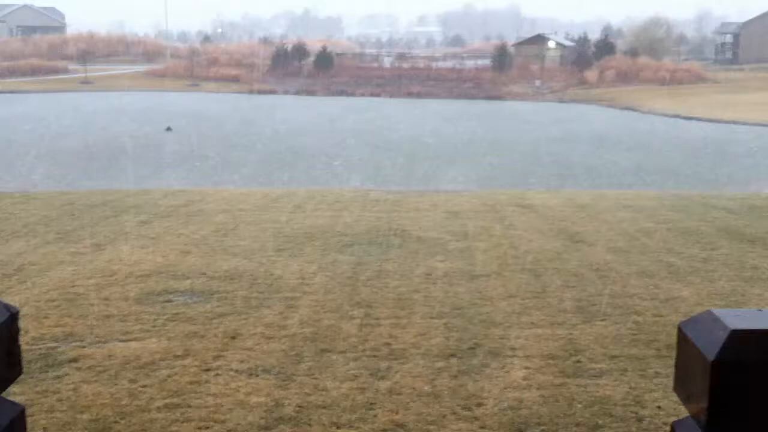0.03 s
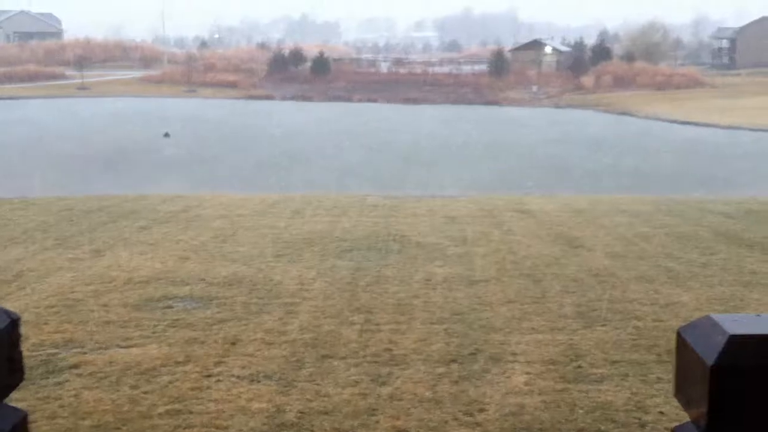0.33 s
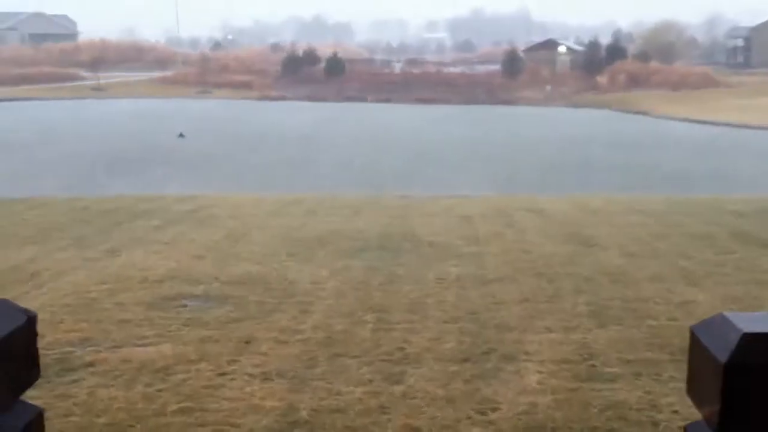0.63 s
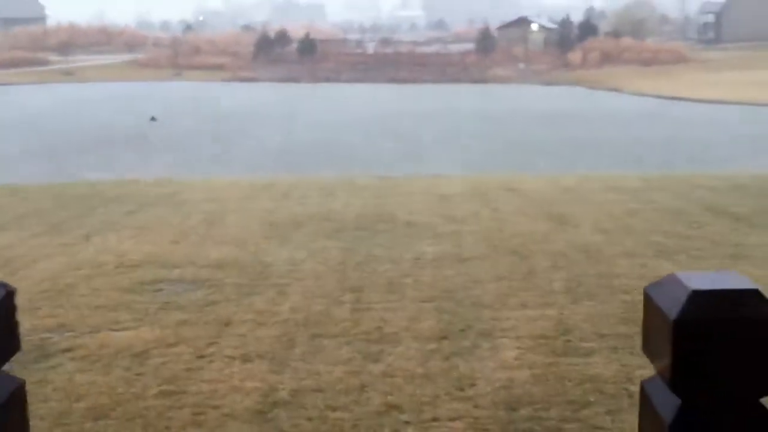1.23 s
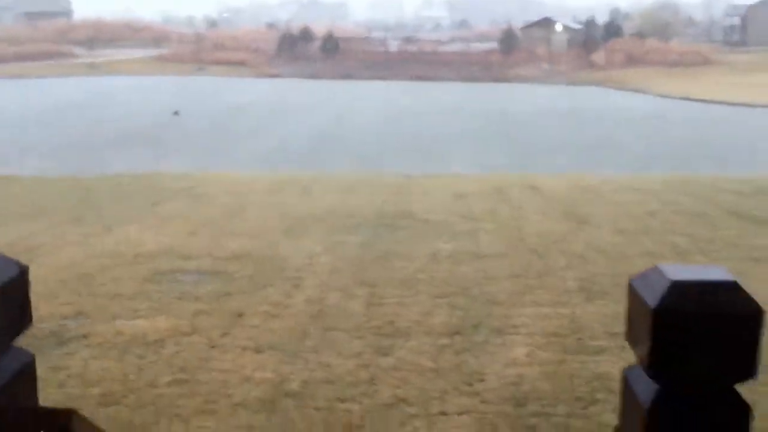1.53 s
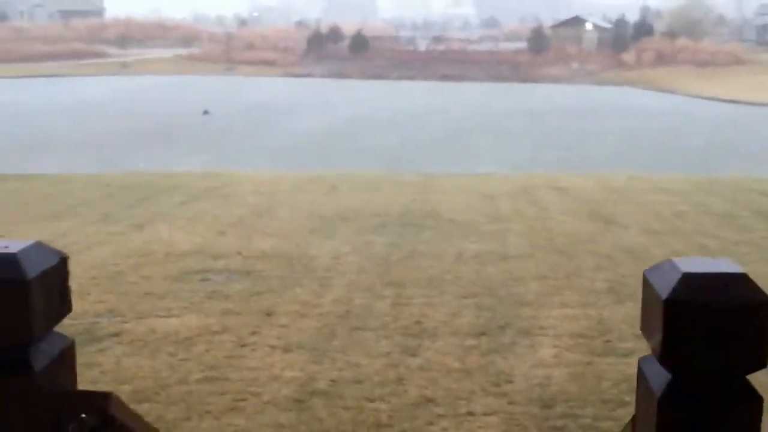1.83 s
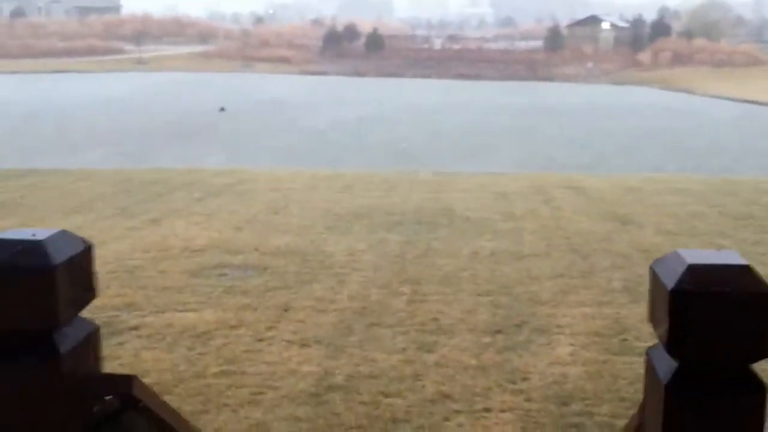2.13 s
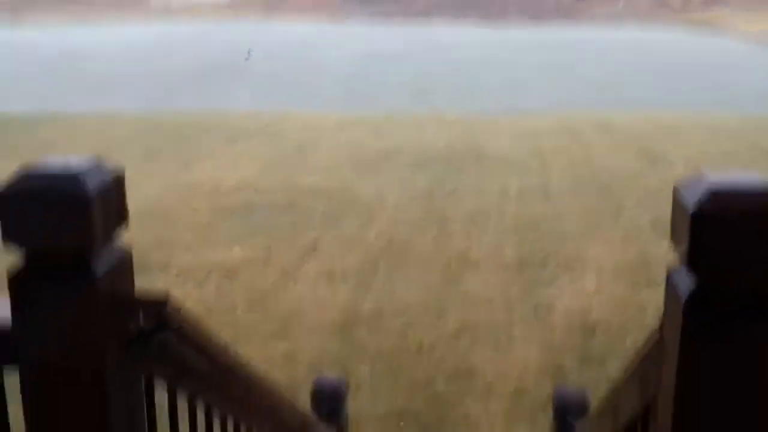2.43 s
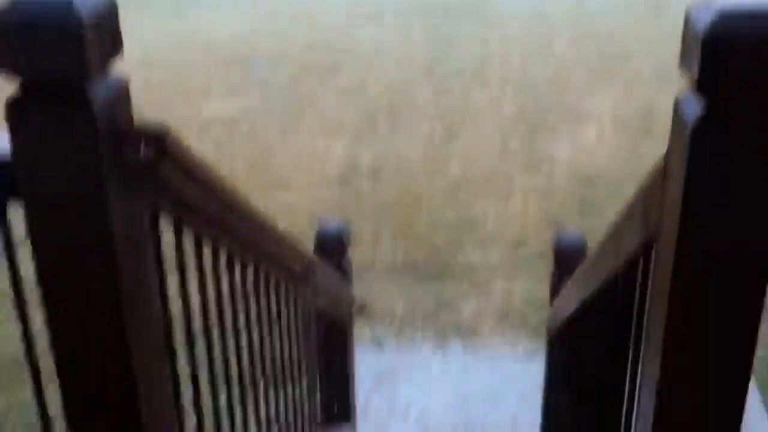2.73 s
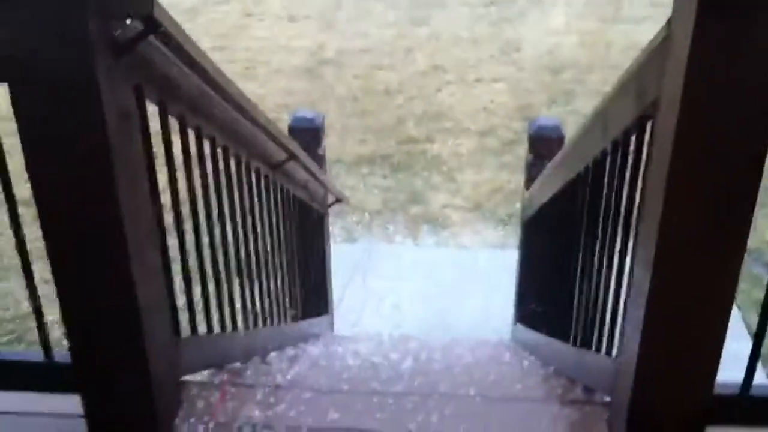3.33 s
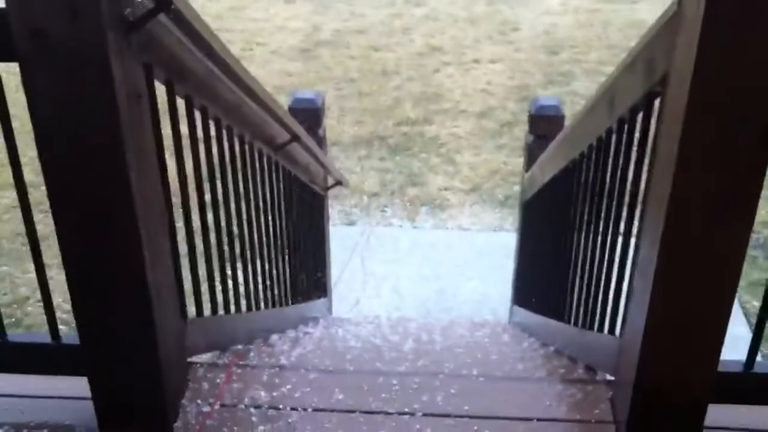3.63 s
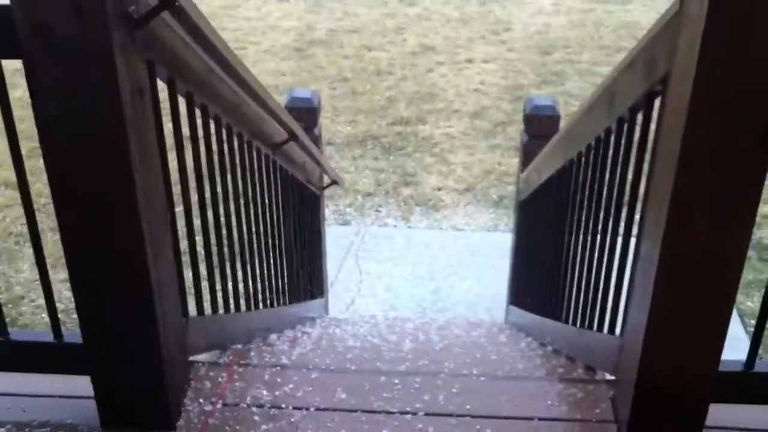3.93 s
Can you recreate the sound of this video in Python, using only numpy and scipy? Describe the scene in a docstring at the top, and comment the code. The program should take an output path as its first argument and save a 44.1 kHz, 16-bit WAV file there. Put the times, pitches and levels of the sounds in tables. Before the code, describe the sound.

Dense hail comes down outdoors, a constant hiss and patter across the grass and a wooden deck. Throughout, larger stones knock and shatter on the wood with short hollow notes, and dry ticks land close by.

```python
"""Hail falls steadily on a wooden deck and the lawn beyond it.
Countless far stones merge into a hiss, while small pellets patter and middling stones tap on the boards.
Big stones clack on the wood and shatter, each with a short echo. Some set a rail or board ringing,
and a few land close by as dry, sharp ticks."""
import sys
import numpy as np
from scipy import signal
from scipy.fft import rfft, irfft
from scipy.io import wavfile

SR = 44100
rng = np.random.default_rng(int(sys.argv[2]) if len(sys.argv) > 2 else 0)


def put_to_file(sound):
    """Save the sound as 16-bit audio at rate SR, in the file named by the first command-line argument."""
    columns = np.atleast_2d(sound).T  # one column per channel
    safe = np.clip(columns, -1, 1)
    whole_steps = np.round(safe * 32767)
    wavfile.write(sys.argv[1], SR, whole_steps.astype(np.int16))


N = 176400
T = np.arange(N) / SR

# how hard it hails over time: t/s, level/dB
HAIL_STRENGTH = [(.12, -23.5), (.3, -25), (.68, -26), (.8, -26.5), (1.05, -24.5), (1.25, -26), (1.46, -26),
                 (1.66, -25.5), (1.95, -26.5), (2.12, -25.5), (2.3, -25), (2.5, -26), (2.8, -25),
                 (3.15, -25.5), (3.45, -24), (3.59, -25.5), (3.75, -23.5), (4, -26.5)]
# tone of the far hiss before the deck shapes it: f/Hz, level/dB
HISS_TONE = [(60, 1), (150, 2), (300, 1), (500, -0.2), (800, -0.65), (2000, 1.17), (4000, -4.5),
             (6000, -2.5), (10000, 0), (15000, 5.5)]
# broad tone of the deck and its surroundings: f/Hz, level/dB
DECK_TONE = [(15, -72), (25, -69), (82, -28), (148, -12.5), (216, -9), (267, -5), (323, -10), (360, -6.5),
             (434, -10), (744, -4), (948, -4.5), (1180, -2.5), (1670, -4), (1860, -0.5), (2860, -8.5),
             (3640, -5.5), (4640, -8), (5030, -12), (5920, -6.5), (7140, -11), (8400, -10), (10400, -13),
             (13600, -30.5), (15600, -49)]
# ringing of the boards, added to that tone: f/Hz, width/Hz, level/dB
BOARD_RESONANCES = [(152, 56, -9), (269, 33, -8), (773, 64, -10), (850, 78, -13), (1830, 15, -33),
                    (4640, 210, -6.5), (5460, 200, -8)]
# notes of a board when a stone hits it: f/Hz, width/Hz, level/dB
BOARD_NOTES = [(540, 130, 0.5), (714, 190, 1), (836, 200, -3.5), (958, 31, -5), (1290, 320, -12),
               (1487, 100, 0.5), (1782, 35, -0.5), (2090, 94, -1), (2330, 34, -1.5)]
# big stones: t/s, thud level/dB, knock level/dB, crack level/dB
BIG_STONES = [(0.146, -24, -16, -17), (0.201, -28, -24, -27), (0.241, -29, -19, -18),
              (0.277, -36, -19, -23), (0.321, -32, -24, -21), (0.45, -36, -26, -20),
              (0.461, -33, -19, -19.5), (0.532, -30, -23, -22), (0.57, -38, -23, -27),
              (0.585, -36, -19, -23), (0.592, -34, -20, -20), (0.617, -39, -29, -27),
              (0.721, -28, -23, -21), (0.82, -36, -22, -24), (0.863, -33, -24, -22), (0.893, -27, -20, -18),
              (0.923, -31, -20, -18), (0.934, -26, -17, -22), (0.966, -26, -19, -24),
              (1.004, -26, -19, -23), (1.022, -29, -20, -21), (1.046, -33, -24, -19),
              (1.076, -30, -17, -26), (1.099, -33, -20, -22), (1.126, -29, -24, -26),
              (1.138, -31, -18, -21), (1.183, -24, -17, -21), (1.272, -31, -20, -20),
              (1.284, -31, -17, -20), (1.331, -40, -28, -27), (1.392, -35, -22, -30),
              (1.406, -35, -22, -32), (1.495, -33, -24, -23), (1.503, -30, -21, -25), (1.53, -26, -24, -20),
              (1.549, -28, -18, -20), (1.577, -30, -21, -24), (1.605, -28, -22, -30),
              (1.699, -36, -20, -29), (1.717, -21, -18, -21), (1.758, -30, -21, -20),
              (1.818, -27, -23, -25), (1.861, -22, -22, -27), (1.976, -42, -32, -21),
              (1.998, -30, -31, -22), (2.012, -24, -23, -27), (2.051, -30, -19, -26), (2.18, -28, -23, -22),
              (2.197, -27, -22, -24), (2.24, -23, -19, -22), (2.274, -22, -17, -19), (2.311, -36, -22, -24),
              (2.375, -41, -32, -24), (2.428, -32, -24, -20), (2.576, -28, -22, -20),
              (2.617, -24, -19, -20), (2.655, -28, -22, -22), (2.675, -24, -17, -20),
              (2.721, -31, -26, -22), (2.77, -37, -24, -23), (2.831, -29, -20, -24), (2.861, -29, -21, -22),
              (2.872, -28, -20, -22), (2.918, -31, -21, -18), (2.933, -25, -21, -18),
              (2.958, -21, -17, -20), (3.001, -31, -26, -22), (3.092, -28, -21, -27),
              (3.194, -27, -23, -23), (3.206, -22, -16, -17), (3.251, -27, -20, -19),
              (3.301, -32, -20, -18), (3.359, -31, -20, -27), (3.419, -29, -21, -18),
              (3.432, -27, -20, -16), (3.456, -25, -17, -17), (3.499, -28, -20, -19),
              (3.523, -31, -19, -26), (3.635, -28, -20, -20), (3.71, -34, -21, -20), (3.725, -30, -16, -18),
              (3.798, -25, -19, -21), (3.808, -23, -17, -17), (3.821, -29, -17, -20),
              (3.873, -27, -20, -20), (3.934, -32, -17, -19), (3.953, -23, -16, -21)]
# hits that set a rail or board ringing: t/s, level/dB, f/Hz, fade time/s
RINGING_HITS = [(0.148, -16, 3760, 0.01), (.147, -10.5, 983, 0.016), (.178, -22, 640, 0.016),
                (0.249, -29, 1840, 0.014), (.461, -17, 3580, 0.006), (.468, -16.5, 2394, 0.0097),
                (.278, -21, 1860, .013), (.592, -22, 6250, .007), (0.593, -15.5, 1230, 0.0086),
                (.595, -16, 1523, 0.014), (.597, -22, 2080, .01), (.65, -23, 1390, 0.0074),
                (.935, -20, 1190, 0.015), (.935, -17, 1710, .009), (.937, -20, 2520, 0.0088),
                (1.022, -20, 2520, .008), (1.048, -28, 6300, .008), (1.078, -18.5, 1203, 0.015),
                (1.089, -20, 1600, .009), (1.135, -17.5, 1400, .009), (1.282, -18, 2240, .008),
                (1.405, -16, 1330, .012), (1.506, -13, 2190, 0.0073), (1.552, -12, 3790, 0.006),
                (1.701, -19, 1192, 0.017), (1.722, -23, 603, 0.013), (1.863, -23.5, 516, 0.022),
                (1.863, -17, 990, 0.011), (2.014, -23, 856, .011), (2.242, -15, 2000, 0.011),
                (2.245, -23, 847, 0.026), (2.276, -19, 1800, .011), (2.28, -18, 2140, 0.013),
                (2.619, -21, 803, .013), (2.747, -24, 1790, .013), (2.836, -18, 1250, 0.011),
                (2.962, -28, 407, 0.02), (3.207, -15.5, 752, 0.013), (3.21, -17, 2050, .009),
                (3.221, -16.5, 1775, .013), (3.812, -22.5, 715, 0.013), (3.806, -22, 1890, .012),
                (3.819, -20, 1830, .015), (3.823, -16, 1560, 0.016), (3.937, -23, 1940, .011),
                (3.951, -19.5, 1820, 0.03), (3.983, -23, 1830, .02)]
# stones landing close by: t/s, level/dB, f/Hz, snap level against the ring/dB
CLOSE_HITS = [(0.1485, -6, 3530, -7), (.2415, -12, 3810, -9), (0.2518, -12, 2020, -5),
              (0.3236, -11, 1550, 0), (0.4622, 0, 3500, -4), (.5322, -4.5, 4200, 4.5),
              (0.5393, -8, 1560, -5), (.5938, -8.5, 6200, -6), (0.7243, -9.5, 6100, 4),
              (.7343, -11, 5600, 4), (0.8195, -9, 3650, 3), (0.8937, -10, 4400, -1), (0.9246, -8, 4100, 6),
              (0.941, -11, 1690, -5), (1.0483, -8.5, 6600, -4), (1.11, -11.5, 6900, -5),
              (1.1845, -9.5, 3660, -12), (1.1933, -10, 1900, -13), (1.273, -11, 7490, -2),
              (1.2837, -7, 2400, 2), (1.2905, -12, 5860, -1), (1.4956, -4.5, 2040, 4), (1.503, -9, 2400, 9),
              (1.5076, -2.5, 2350, -13), (1.5319, -9.5, 5950, 8), (1.5529, -5, 3700, -2),
              (1.7297, -15, 6540, -3), (1.761, -7, 3750, -3), (1.9754, -17, 7230, -4),
              (1.9817, -11, 5600, -7), (2.0034, -8.5, 6000, -7), (2.199, -9, 8100, 1),
              (2.431, -9.5, 3400, -1), (2.436, -9, 3440, -3), (2.576, -6, 9240, -6), (2.5823, -9, 6100, -7),
              (2.724, -13, 8400, -5), (2.8655, -10, 4260, -2), (2.925, -12, 4400, -8),
              (2.9348, -5, 4300, -2), (3.008, -12, 5900, -3), (3.213, -12, 6200, -2),
              (3.256, -9, 6170, -10), (3.302, -10, 8870, -12), (3.308, -11, 6040, -10),
              (3.424, -8, 7900, 2), (3.434, -4, 4500, -14), (3.506, -8, 1550, 4), (3.5493, -10, 6200, -1),
              (3.5876, -14, 9040, -14), (3.5935, -14, 5900, -11), (3.6338, -10, 5640, -1),
              (3.7272, -8, 5040, 3), (3.939, -8, 5860, 0), (3.9594, -11, 8570, 0)]

START_S, ATTACK_S = .12, 0.00322   # when the hail begins; how fast a big stone's sound builds


def from_db(db):
    """Turn decibels into a factor to multiply by."""
    return 10 ** (np.asarray(db) / 20)


def rms_one(x):
    """Scale a sound to an average (rms) level of 1."""
    return x / np.sqrt(np.mean(x ** 2) + 1e-20)


def band(x, low_hz, high_hz):
    """Keep what lies between two frequencies."""
    return signal.sosfilt(signal.butter(2, [low_hz, high_hz], "band", fs=SR, output="sos"), x)


def shape_tone(x, points, size=4096):
    """Turn lows and highs up or down along a curve of (f/Hz, level/dB) points."""
    hz, db = np.transpose(sorted(points))
    grid_hz = np.maximum(np.arange(size // 2 + 1) * SR / size, 1)
    gains = from_db(np.interp(np.log(grid_hz), np.log(hz), db))
    # a minimum-phase filter: nothing sounds ahead of a hit
    cepstrum = irfft(np.log(gains))
    cepstrum[1:size // 2] *= 2
    response = irfft(np.exp(rfft(cepstrum[:size // 2], size)))
    return signal.fftconvolve(x, response)[:N]


def resonate(x, hz, width_hz):
    """Make a sound ring at one pitch; the narrower the width, the longer it rings."""
    r = np.exp(-np.pi * width_hz / SR)
    feedback = [1, -2 * r * np.cos(2 * np.pi * hz / SR), r * r]
    return signal.lfilter(np.array([1, 0, -1]) * (1 - r * r) / 2, feedback, x + 1e-18)


def random_clicks(per_s, spread_db):
    """Clicks at random times, many small and few large."""
    sizes = from_db(spread_db * np.minimum(rng.exponential(1, N), 3.5))
    return rms_one((rng.random(N) < per_s / SR) * sizes * rng.choice([-1, 1], N))


def deck(x):
    """The deck gives a sound its broad tone, and the boards ring along."""
    x = shape_tone(x, DECK_TONE)
    return x + sum(from_db(db) * resonate(x, hz, width) for hz, width, db in BOARD_RESONANCES)


def far_hiss():
    """Countless far stones merge into an even hiss."""
    return rms_one(deck(shape_tone(rng.standard_normal(N), HISS_TONE)))


def pellets(per_s=1100, pitch_count=14, sharpness=4.3):
    """Small pellets patter at random, each ringing for a few cycles at one of several pitches."""
    pings = sum(resonate(random_clicks(per_s / pitch_count, spread_db=4), hz, hz / sharpness)
                for hz in np.geomspace(600, 11000, pitch_count))
    return rms_one(deck(pings))


def taps():
    """Middling stones tap the boards, each sounding its own mix of the boards' notes."""
    clicks = random_clicks(per_s=140, spread_db=0.5)
    notes = sum(from_db(db) * rms_one(resonate(clicks * rng.uniform(-1.32, 1, N), hz, width))
                for hz, width, db in BOARD_NOTES)
    return rms_one(notes)


def shattering_stones(shatter_s=0.0073, echo_s=0.054, echo_db=-5.5):
    """Each big stone bursts into shards that die away quickly, and leaves a smooth echo."""
    times, thud_db, knock_db, crack_db = np.transpose(BIG_STONES)
    age = T[:SR // 2]
    rise = 1 - np.exp(-age / ATTACK_S)
    shapes = [rise * np.exp(-age / fade_s) for fade_s in (shatter_s, echo_s)]
    shards = random_clicks(per_s=4000, spread_db=4)
    echo = rng.standard_normal(N)
    out = np.zeros(N)
    for db, range_hz in ((thud_db + 0.4, (218, 1000)),
                         (knock_db - 0.5, (1034, 2860)),
                         (crack_db - 0.13, (2510, 14600))):
        # overlapping hits add up in energy, which is level squared
        energy = np.bincount((times * SR).astype(int), from_db(db) ** 2, N)[:N]
        fast, slow = (np.sqrt(np.abs(signal.fftconvolve(energy, shape ** 2)[:N])) for shape in shapes)
        signs = rng.choice([-1, 1], N)   # gives each range its own noise
        burst = signs * (fast * shards + from_db(echo_db) * slow * echo)
        out += band(deck(burst), *range_hz) / np.std(band(deck(echo), *range_hz))
    return out


def ringing_wood(gain_db=0.5, rise_s=0.0016, roughness=0.4):
    """A struck rail or board sounds one short hollow note, blurred by other notes close to it."""
    out, age = np.zeros(N + SR), T[:SR // 5]
    for t, db, hz, fade_s in RINGING_HITS:
        blur = rms_one(resonate(rng.standard_normal(len(age)), hz, width_hz=0.12 * hz))
        note = np.sin(2 * np.pi * hz * age) + roughness * blur
        shape = (1 - np.exp(-age / rise_s)) * np.exp(-age / fade_s)
        start = int(t * SR)
        out[start:start + len(age)] += from_db(db + gain_db) * note * shape
    return out[:N]


def close_ticks(gain_db=2.5, snap_s=0.00053, ring_s=0.00059):
    """A close stone makes a noisy snap and a tiny ring, each hit with its own balance of the two."""
    out, age = np.zeros(N + SR), T[:SR // 100]
    for t, db, hz, snap_db in CLOSE_HITS:
        snap = from_db(snap_db) * rng.standard_normal(len(age)) * np.exp(-age / snap_s)
        ring = np.sin(2 * np.pi * hz * age) * np.exp(-age / ring_s)
        tick = band(snap + ring, 860, 10000)
        start = int(t * SR)
        out[start:start + len(age)] += from_db(db + gain_db) * tick / np.abs(tick).max()
    return signal.sosfilt(signal.butter(6, 12000, "low", fs=SR, output="sos"), out[:N])


def clacks(gain_db=1.5, damping=0.99):
    """As a big stone meets the wood, it strikes all the boards' notes at once in a random mix."""
    times, _, knock_db, _ = np.transpose(BIG_STONES)
    out, age = np.zeros(N + SR), T[:SR // 25]
    notes = np.array([from_db(db) * np.sin(2 * np.pi * hz * age) * np.exp(-np.pi * damping * width * age)
                      for hz, width, db in BOARD_NOTES])
    mixes = rng.normal(0, 1 / np.sqrt(len(notes)), (len(times), len(notes)))
    for t, db, mix in zip(times, knock_db, mixes):
        start = int((t + ATTACK_S) * SR)
        out[start:start + len(age)] += from_db(db + gain_db) * (mix @ notes)
    return band(out[:N], 516, 9000)


def scene():
    """Single hits stand out over a patter that gently swells and eases, all in one channel."""
    strength = from_db(np.interp(T, *np.transpose(HAIL_STRENGTH)))
    patter = strength * (far_hiss() + from_db(-5) * pellets() + from_db(-9.5) * taps())
    hail = patter + shattering_stones() + clacks() + ringing_wood() + close_ticks()
    return (hail * (T >= START_S))[None]


def record(dry, peak_limit=0.65, cutoff_hz=16200):
    """Round off the loudest peaks and cut the very highest treble."""
    rounded = dry / (1 + (dry / peak_limit) ** 6) ** (1 / 6)
    return signal.sosfilt(signal.cheby2(20, 60, cutoff_hz, fs=SR, output="sos"), rounded)


dry = scene()
out = record(dry)
put_to_file(out)
```